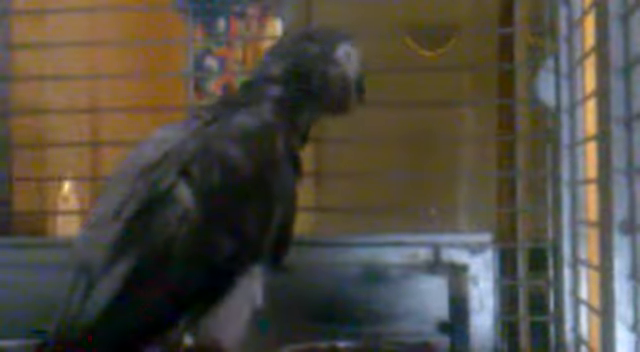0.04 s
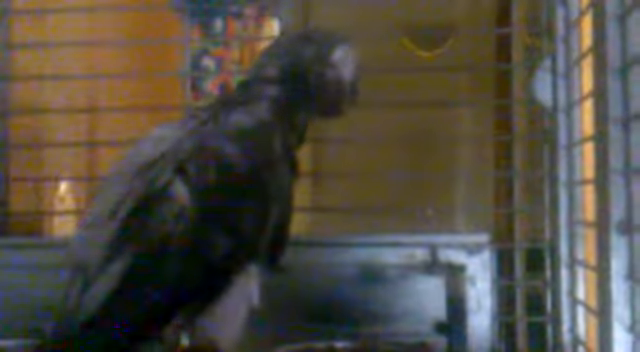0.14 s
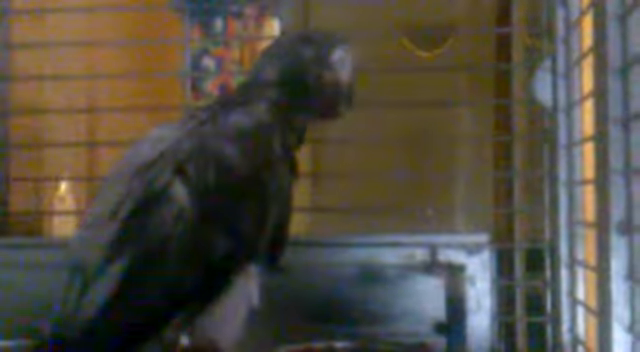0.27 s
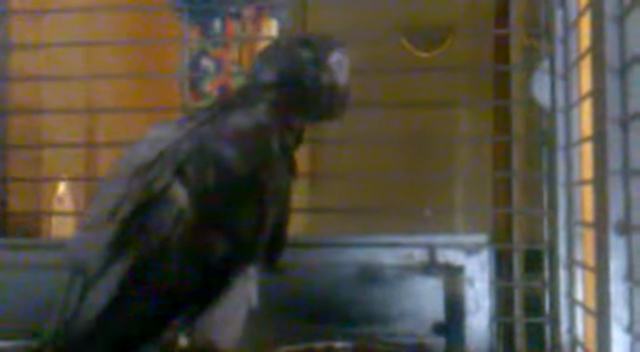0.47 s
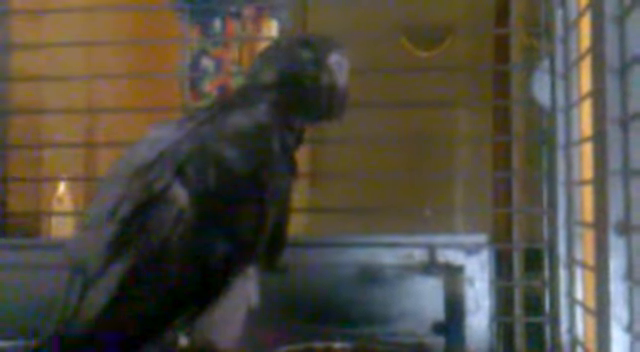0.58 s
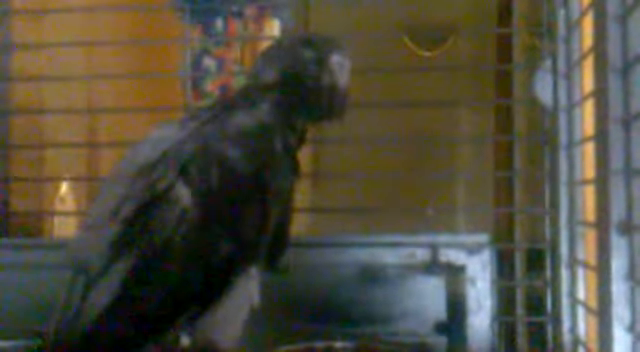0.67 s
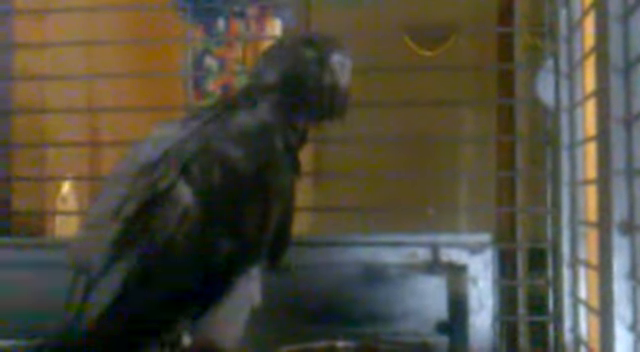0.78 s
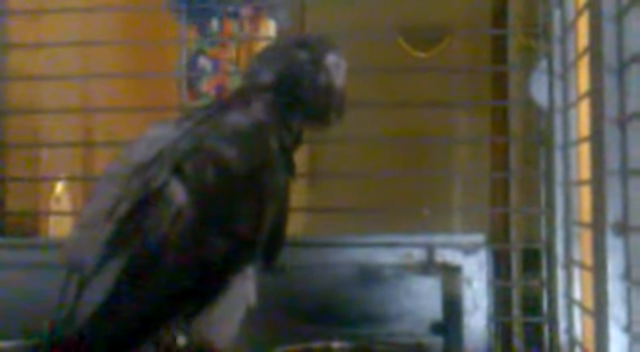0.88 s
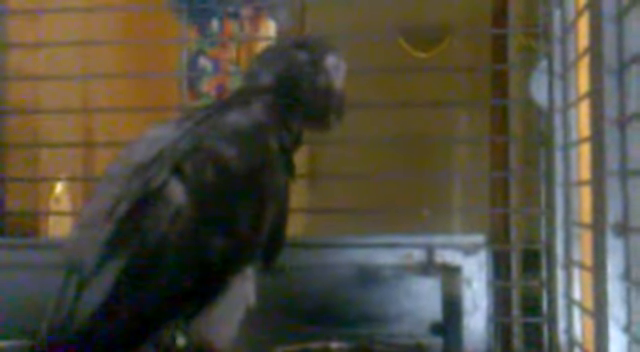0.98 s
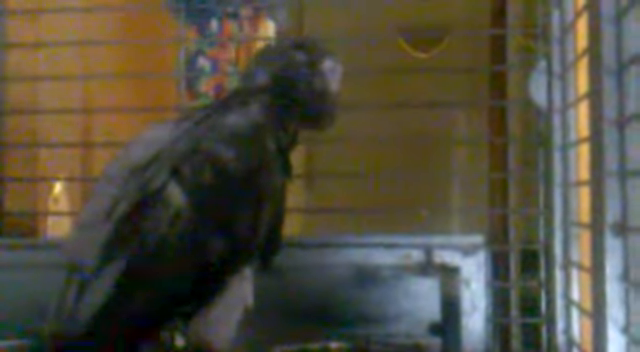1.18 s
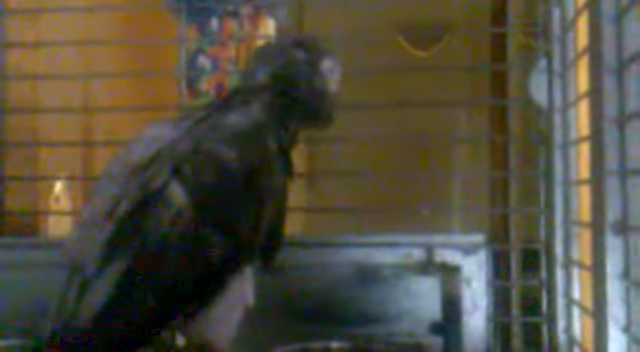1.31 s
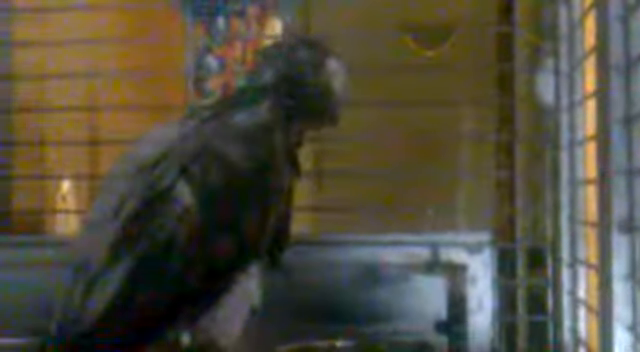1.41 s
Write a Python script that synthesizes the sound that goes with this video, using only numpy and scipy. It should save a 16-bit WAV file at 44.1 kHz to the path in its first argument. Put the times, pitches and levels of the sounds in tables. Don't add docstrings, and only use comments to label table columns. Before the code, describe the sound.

A caged parrot gives two short harsh calls, chirp, rasp and piercing whistle, then a squawk.

```python
import sys
import numpy as np
from scipy import signal
from scipy.fft import rfft, irfft, next_fast_len
from scipy.io import wavfile
from scipy.ndimage import uniform_filter1d, map_coordinates

SR = 44100
rng = np.random.default_rng(int(sys.argv[2]) if len(sys.argv) > 2 else 0)


def file_out(sig):
    cols = np.atleast_2d(sig).T
    lim = np.clip(cols, -1, 1)
    pcm = np.round(lim * 32767).astype(np.int16)
    wavfile.write(sys.argv[1], SR, pcm)


def ratio_of_db(decibels):
    return 10 ** (np.asarray(decibels, float) / 20)


N = 63945


def unit(x):
    return x / np.sqrt(np.mean(x ** 2) + 1e-20)


def along(points, hz):
    point_hz, values = np.transpose(points)
    return np.interp(np.log(hz + 1), np.log(point_hz + 1), values)


def curves(rows):
    start_s, *columns = np.transpose(rows)
    t = np.arange(N) / SR
    sounding = (t >= start_s[0]) & (t <= start_s[-1])
    return [np.interp(t, start_s, column) for column in columns] + [sounding]


def wobble(rate):
    knots = rng.standard_normal(int(N * rate / SR) + 4)
    return map_coordinates(knots, [np.arange(N) * rate / SR])


def filtered(x, response):
    m = next_fast_len(N + SR // 2)
    spectrum = rfft(x, m) * response(np.fft.rfftfreq(m, 1 / SR))
    return irfft(spectrum, m)[..., :N]


def resonances(peaks):
    def response(f):
        total = 0
        for k, (centre, width, db) in enumerate(peaks):
            band = 1j * f * width / (centre * centre - f * f + 1j * f * width)
            total = total + (-1) ** k * ratio_of_db(db) * band
        return total
    return response


# pitch_hz, width_hz, level_db
MOTOR_LINES = [(55.3, 9.3, -1), (117.3, 6.6, -11.5), (165.6, 11, -8.5), (343, 4.1, -21.5), (487, 11, -1.5)]


def motor_hum(swing_db):
    t = np.arange(N) / SR
    lines = []
    for hz, width_hz, db in MOTOR_LINES:
        level = ratio_of_db(db + 1.8 * wobble(width_hz))
        lines.append(level * np.sin(2 * np.pi * hz * t + 0.6 * wobble(width_hz)))
    return ratio_of_db(swing_db) * sum(lines[:-1]) + ratio_of_db(0.55 * swing_db) * lines[-1]


# frequency_hz, level_db (per Hz)
AIR_COLOUR = [(15, -50.5), (40, -29.5), (60, -10), (169, -5.5), (193, -15.5), (482, -15), (600, -19.5),
              (7000, -34.5), (12500, -32.5), (15500, -33)]


def air_hiss(swing_db):
    hiss = unit(filtered(rng.standard_normal(N), lambda f: ratio_of_db(along(AIR_COLOUR, f))))
    return ratio_of_db(-4 + 0.61 * swing_db) * hiss


# start_s, level_db (hum let through)
GATE_OPENING = [(0, -62.5), (.04, -57.5), (.06, -42.5), (.18, -47.5), (.36, -38.5), (.56, -52.5),
                (.66, -61.5), (.95, -76.5), (.98, -53), (1.055, -56), (1.1, -40), (1.28, -50.5),
                (1.45, -60)]


def background():
    gate_db, _ = curves(GATE_OPENING)
    mean_db = gate_db.mean()
    swing_db = gate_db - mean_db
    return ratio_of_db(mean_db) * (motor_hum(swing_db) + air_hiss(swing_db))


# frequency_hz, t60_s
ROOM_DECAY = [(300, 0.26), (1500, 0.24), (3200, 0.26), (6000, 0.25), (9000, 0.22), (15000, 0.14)]


def room(x):
    first_wall_s, late_db, late_longer = 0.004, -32, 2.2
    hz, t, z = signal.stft(rng.standard_normal(SR), SR, nperseg=256)
    fall_db = -60 * t / along(ROOM_DECAY, hz)[:, None]
    decay = ratio_of_db(fall_db) + ratio_of_db(late_db + fall_db / late_longer)
    tail = signal.istft(z * decay, SR, nperseg=256)[1]
    tail = np.pad(tail, (round(first_wall_s * SR), 0))
    return signal.fftconvolve(x, tail / np.linalg.norm(tail))[:N]


# start_s (centre), pitch_hz, level_db, length_s
WARBLE_TONES = [(.123, 1900, -38, 0.0053), (.124, 1400, -42, 0.0053), (.203, 2800, -22, 0.0069),
                (.218, 3064, -24, 0.012), (.227, 2950, -25, 0.0046), (.232, 3193, -27.5, .006),
                (.24, 2497, -23, .008), (.238, 4678, -34.5, .008), (.248, 4350, -23, 0.0073),
                (.248, 2300, -24.5, .004), (.257, 2039, -26.5, .01), (.271, 2602, -23.5, 0.0058),
                (.272, 5590, -30, 0.009), (.277, 2940, -22, 0.0083), (.292, 2560, -22, .007),
                (.295, 3800, -21.5, 0.011), (.3, 3203, -17, .006), (.304, 2109, -25, .007),
                (.342, 4290, -13.5, .006), (.347, 5325, -21.5, .007), (.349, 2075, -17, 0.0066),
                (0.98, 2506, -37.5, 0.0091), (.996, 4000, -43, .006), (.997, 1900, -46, 0.007),
                (1.015, 5250, -43, .006), (1.018, 1393, -50, 0.0054), (1.027, 3800, -40, 0.0062),
                (1.03, 1780, -48.5, 0.011), (1.045, 5350, -38, .008), (1.048, 1660, -46.5, 0.0043),
                (1.063, 2614, -28.5, .009), (1.063, 5210, -31.5, 0.0056), (1.066, 1402, -39.5, .008),
                (1.079, 3485, -19.5, .006), (1.079, 4200, -17.5, 0.0074), (1.087, 3530, -19, 0.0078),
                (1.087, 4395, -18.5, .006), (1.091, 2017, -11, 0.0053), (1.092, 3824, -14.5, 0.00505),
                (1.1, 4034, -14, 0.0099), (1.125, 3997, -13, 0.0078), (1.133, 726, -33, 0.017),
                (1.143, 3625, -20.5, 0.012), (1.153, 5454, -18.5, 0.0067), (1.161, 3740, -17, .006),
                (1.163, 1425, -28.5, 0.014), (1.162, 2570, -15.5, 0.0055), (1.178, 4150, -30, 0.0089),
                (1.185, 4770, -28.5, 0.02), (1.188, 2605, -25.5, .012)]


def warbles():
    t, out = np.arange(N) / SR, np.zeros(N)
    for s, hz, db, length in WARBLE_TONES:
        drift, turn = rng.standard_normal(2)
        u = (t - s) / length
        cycles = hz * length * (u + 0.025 * drift * u * u) + turn
        out += np.sqrt(2) * ratio_of_db(db) * np.exp(-4 * u * u) * np.sin(2 * np.pi * cycles)
    return out * ratio_of_db(5 * wobble(350))


# frequency_hz, width_hz, level_db
THROAT_BACK = [(920, 630, -18), (1900, 230.5, 3), (2800, 500, 10), (4200, 730, -19)]
# frequency_hz, width_hz, level_db
THROAT_FRONT = [(1194, 240, -8.5), (2300, 150, -1), (3500, 780, -11.5), (4280, 1200, 8.5), (7100, 500, -14)]


def rasp(rows):
    slips_per_s, scatter, breath = 520, 0.35, 0.7
    db, forward, on = curves(rows)
    forward = np.clip(forward, 0, 1)
    count = np.floor(np.cumsum(slips_per_s * np.exp(scatter * wobble(200))) / SR)
    slips = np.diff(count, prepend=0) * ratio_of_db(3 * wobble(300))
    air = breath * rng.standard_normal(N) * ratio_of_db(0.37 * wobble(120))
    drive = unit(slips) + air
    back = unit(filtered(drive, resonances(THROAT_BACK)))
    front = unit(filtered(drive, resonances(THROAT_FRONT)))
    return ratio_of_db(db) * on * (np.sqrt(1 - forward) * back + np.sqrt(forward) * front)


def note(rows, partials):
    jitter, flutter_db = 0.2, 14.5
    hz, db, rough, on = curves(rows)
    phase = 2 * np.pi * np.cumsum(hz * (1 + jitter * rough * wobble(400))) / SR
    tone = 0
    for k, level_db in partials:
        level = ratio_of_db(level_db + flutter_db * rough * wobble(250))
        tone = tone + level * np.sin(round(k) * phase + rng.uniform(0, 2 * np.pi))
    return np.sqrt(2) * ratio_of_db(db) * on * tone


def beat(rate_hz, peak_s, depth):
    t = np.arange(N) / SR
    return 1 - depth / 2 + depth / 2 * np.cos(2 * np.pi * rate_hz * (t - peak_s))


# multiple (of the pitch), level_db
PURE_TONE = [(1, 0.5), (2, -22)]
# multiple (of the pitch), level_db
CHESTY_TONE = [(1, -3), (2, -3), (3, -7)]
# start_s, pitch_hz, level_db, roughness (0-1)
RISING_CHIRP = [
    (.041, 2350, -48.5, 0.03),
    (.045, 2480, -34, 0),
    (.05, 2723, -25, 0.2),
    (.055, 2917, -21.5, 0),
    (.0585, 3053, -16, 0.14),
    (.061, 3130, -21, 0.2),
    (.067, 3500, -43.5, 0.2),
]
LOW_GROWL = [
    (.14, 338.5, -59, 0.38),
    (.17, 357, -46, 0.38),
    (.21, 452, -44, .5),
    (.235, 392, -60, 0.92),
]
FALLING_WHISTLE = [
    (.304, 4300, -45, .15),
    (.309, 4619, -21, 0.17),
    (.314, 4987, -8.5, .15),
    (.318, 4400, -13, 0.088),
    (.321, 4022, -34, 0.092),
    (.3235, 3970, -4, 0.068),
    (.327, 3837, -4, 0.051),
    (.33, 3320, -11.5, .15),
    (.334, 3150, -45.5, .2),
]
LOWER_WHISTLE = [
    (.304, 3183, -34.5, .15),
    (.31, 3227, -14, .12),
    (.32, 3210, -14.5, 0.11),
    (.327, 3320, -14.5, .1),
    (.332, 3147, -3, .08),
    (.34, 3197, -3.5, 0.077),
    (.347, 3325, -16, .2),
    (.354, 3290, -4.5, 0.047),
    (.364, 3203, -5.5, 0.075),
    (.376, 3110, -25, .1),
]
LAST_TURN = [
    (.338, 2890, -40, .25),
    (.345, 2656, -11.5, 0.32),
    (.351, 2682, -14.5, 0.35),
    (.354, 3070, -29.5, .2),
    (.359, 3838, -20, .2),
    (.366, 3918, -10, .12),
    (.373, 3950, -41.5, .25),
]
# start_s, level_db, tongue_forward (0-1)
FIRST_RASP = [
    (.116, -74.5, .1),
    (.123, -38.5, 0.03),
    (.135, -46.5, 0.02),
    (.17, -32, 0.1),
    (.203, -27, 0),
    (.235, -26, 0.72),
    (.27, -27, 0.92),
    (.297, -27.5, 0.99),
    (.35, -12, 0.38),
    (.38, -43.5, 0.3),
]


def first_call():
    lower = note(LOWER_WHISTLE, PURE_TONE) * beat(141, 0.36, 0.64)
    whistle = note(FALLING_WHISTLE, PURE_TONE) + lower + note(LAST_TURN, PURE_TONE)
    growling = rasp(FIRST_RASP) + note(LOW_GROWL, CHESTY_TONE)
    return note(RISING_CHIRP, PURE_TONE) + growling + whistle


# multiple (of the pitch), level_db
HARSH_TONE = [(1, 0), (2, -8), (3, -21)]
# start_s, pitch_hz, level_db, roughness (0-1)
HIGH_PEEP = [
    (.963, 4895, -64, .05),
    (.968, 4940, -45.5, .08),
    (.974, 5105, -40, .12),
    (.984, 5110, -49.5, 0.18),
    (1.02, 5224, -56, .25),
]
# start_s, pitch_hz, level_db, roughness (0-1)
REEDY_CHIRP = [
    (.969, 3150, -59.5, .15),
    (.972, 3337, -34, 0.22),
    (.984, 3340, -29, .15),
    (.99, 3324, -37.5, .2),
    (1.008, 3340, -35, .15),
    (1.013, 3092, -37, .2),
    (1.032, 3127, -34.5, .23),
    (1.045, 3050, -61.5, .3),
]
# start_s, level_db, tongue_forward (0-1)
SECOND_RASP = [
    (.968, -75, .5),
    (.975, -49.5, 0.71),
    (1.045, -34.5, 0.47),
    (1.068, -25.5, 0.7),
    (1.078, -22, 0.75),
    (1.13, -13.5, 0.74),
    (1.165, -15, 0.85),
    (1.2, -32.5, 0.65),
]
# start_s, pitch_hz, level_db, roughness (0-1)
LOW_SQUAWK = [
    (1.072, 2344, -41, .3),
    (1.078, 2250, -21, 0.3024),
    (1.091, 1983, -7.5, 0.13),
    (1.098, 2085, -15, .3),
    (1.105, 2398, -3, 0.22),
    (1.118, 2039, -21, 0.34),
    (1.138, 2160, -13, 0.17),
    (1.152, 2203, -18, 0.29),
    (1.178, 2087, -35, 0.3),
]
# start_s, pitch_hz, level_db, roughness (0-1)
HIGH_SCREECH = [
    (1.096, 4750, -40, .2),
    (1.102, 4863, -21.5, .2),
    (1.111, 4610, -14.5, 0.12),
    (1.12, 4559, -9.5, .12),
    (1.127, 4446, -10.5, .15),
    (1.133, 4134, -11, 0.13),
    (1.142, 4806, -21, 0.18),
    (1.151, 5006, -17.5, .2),
    (1.165, 5155, -41, .3),
]


def second_call():
    chirp = note(HIGH_PEEP, PURE_TONE) + note(REEDY_CHIRP, PURE_TONE)
    squawk = note(LOW_SQUAWK, HARSH_TONE) + note(HIGH_SCREECH, PURE_TONE)
    return chirp + rasp(SECOND_RASP) + squawk * beat(67, 0.9, 0.58)


# frequency_hz, level_db
HEAD_COLOUR = [(200, -6.5), (1500, 1), (5300, -0.5), (7000, -2.5), (7800, -8.5), (16000, -30)]


def parrot():
    locked, early = warbles(), np.arange(N) < N // 2
    calls = np.array([first_call() + locked * early, second_call() + locked * ~early])
    return filtered(calls, lambda f: ratio_of_db(along(HEAD_COLOUR, f) - 0.5))


def scene():
    bird = sum(call + ratio_of_db(-4) * room(call) for call in parrot())
    return (bird + background())[None]


# frequency_hz, level_db
FIZZ_COLOUR = [(6500, -60.5), (8500, -5), (11500, 1), (15500, -15)]


def treble_fizz(dry):
    loudness = uniform_filter1d(np.abs(dry), max(1, round(0.002 * SR)))
    fizz = unit(filtered(rng.standard_normal(N), lambda f: ratio_of_db(along(FIZZ_COLOUR, f))))
    return ratio_of_db(-33) * np.abs(2 * loudness) ** 3.5 * fizz


def roll_off(x):
    return signal.sosfilt(signal.butter(12, 15630, fs=SR, output="sos"), x)


def record(dry):
    clip, hardness, top_hz = 0.93, 11, 15640
    x = dry + treble_fizz(dry)
    x = x / (1 + np.abs(x / clip) ** hardness) ** (1 / hardness)
    mix = filtered(x, lambda hz: np.where(hz < top_hz, 1, 0.03))
    return roll_off(mix)


dry = scene()
out = record(dry)
file_out(out)
```